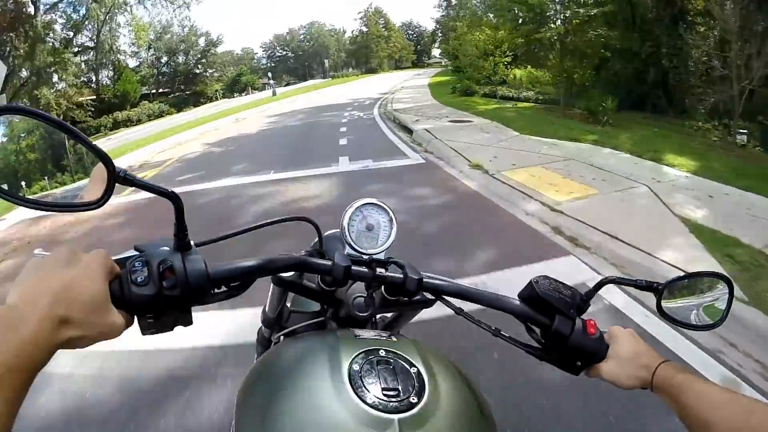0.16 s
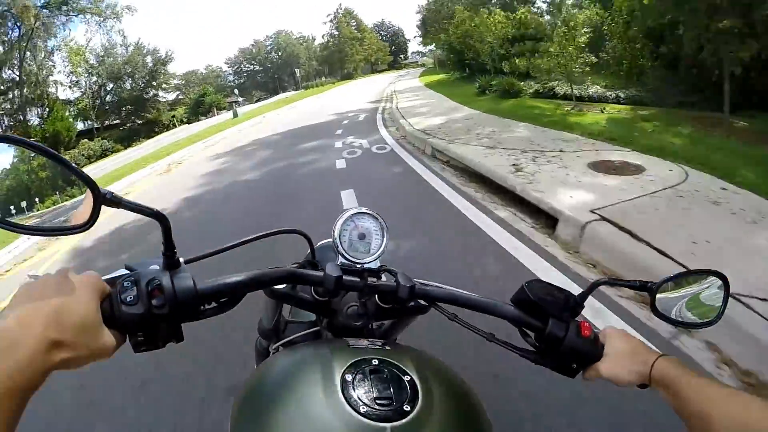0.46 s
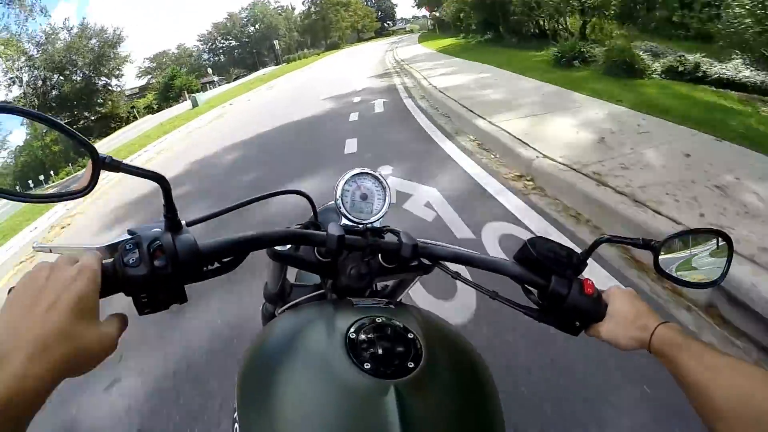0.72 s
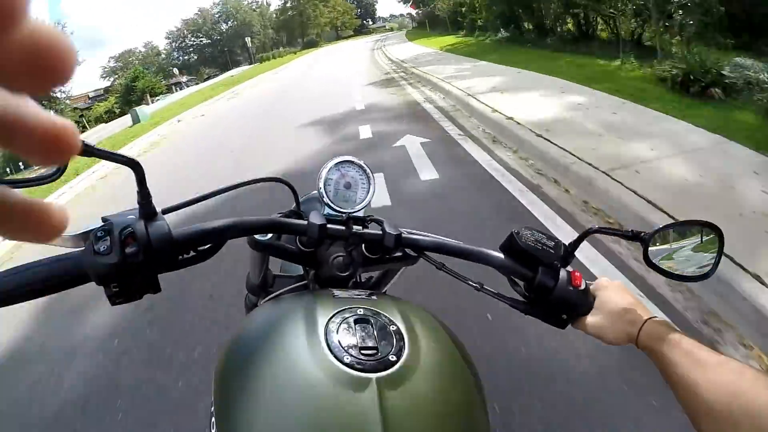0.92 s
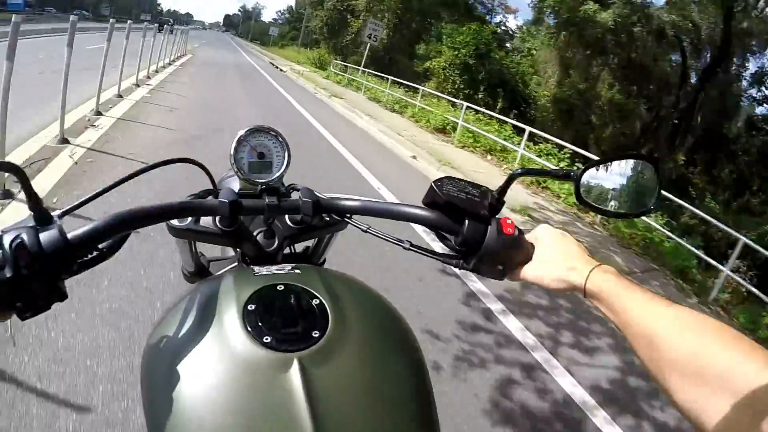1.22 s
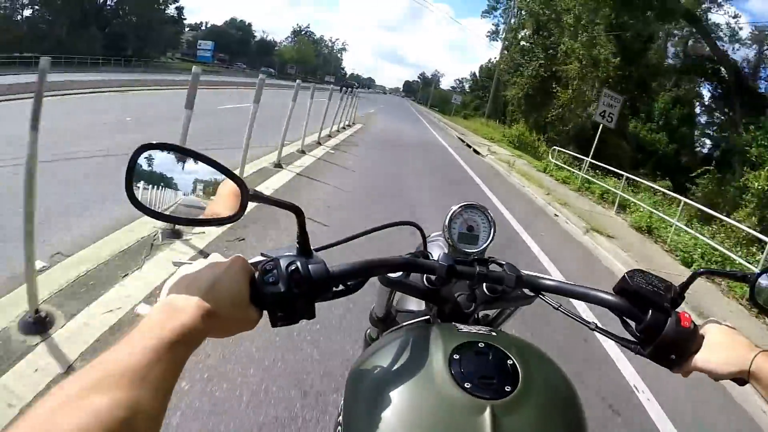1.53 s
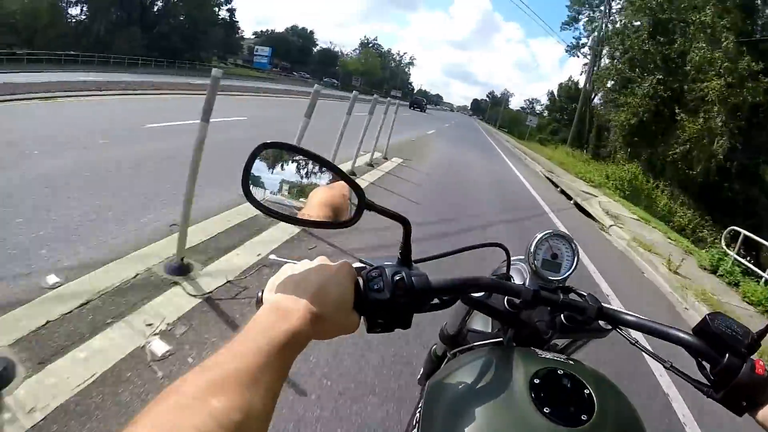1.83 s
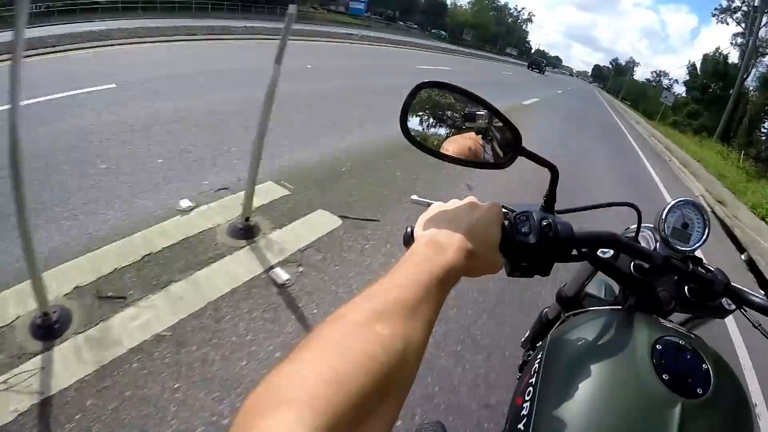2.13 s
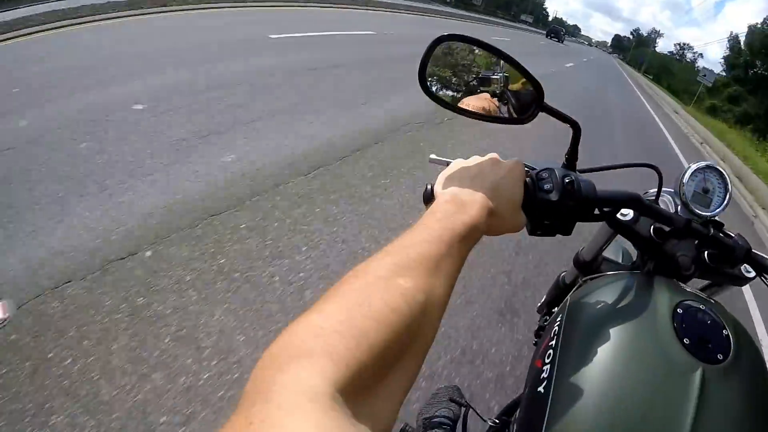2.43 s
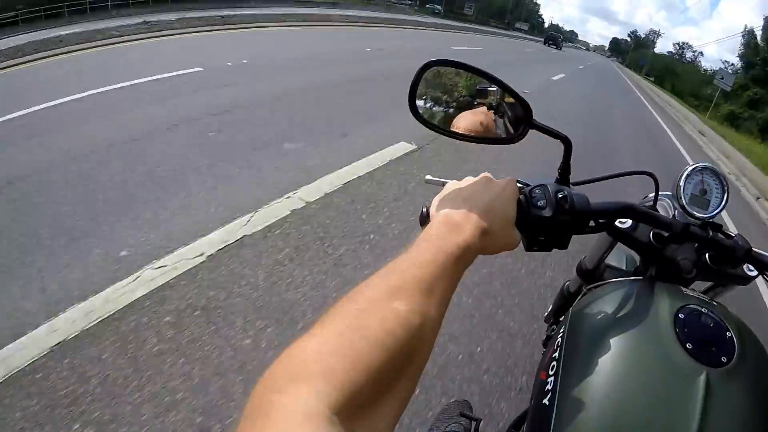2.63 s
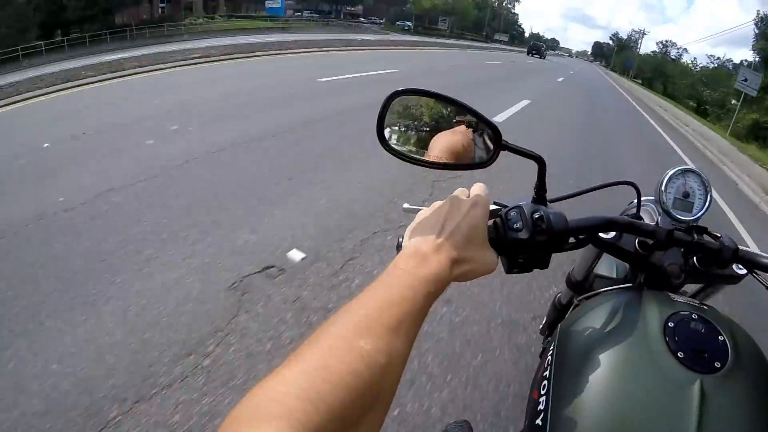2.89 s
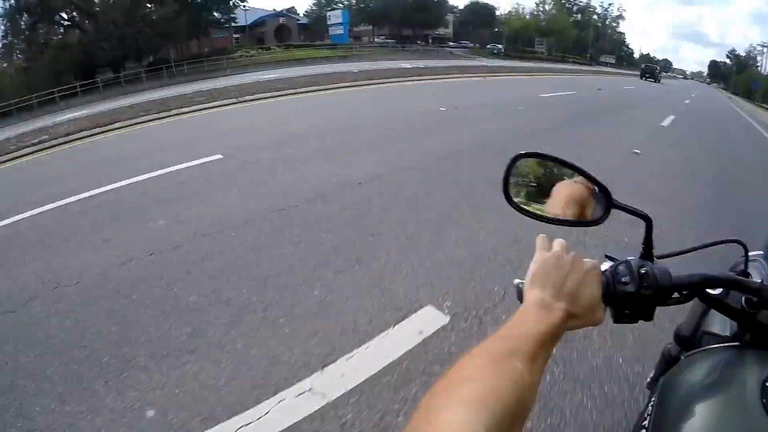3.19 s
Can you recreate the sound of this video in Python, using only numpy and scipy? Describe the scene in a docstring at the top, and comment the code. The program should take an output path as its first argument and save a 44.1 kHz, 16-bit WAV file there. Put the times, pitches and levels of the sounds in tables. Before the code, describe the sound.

A V-twin motorcycle engine heard at the rider's helmet thumps deep and uneven on light throttle, nearly steady in pitch, with soft valve clatter and low wind rumble. At 1.15 seconds it jumps abruptly higher and raspier, climbing steadily. From about 2 seconds a hoarse intake bark joins. Around 3.15 the throttle shuts, pitch and rasp fall, and faint metallic gear clacks follow at 3.2, ending at 3.35.

```python
"""A V-twin cruiser engine, heard from the rider's helmet, rolls on a light throttle. After an abrupt jump in time
it pulls hard, opens up fully and shuts off for an upshift. Two unevenly spaced firings per cycle make the
exhaust pipe thump; noise bursts shaped by filters add a rasp and, when pulling hard, an intake bark.
Filtered hiss and ticks make the valve clatter, slowly wavering noise makes the wind, and short
bursts of noise make the gearbox clack."""
import sys
import numpy as np
from scipy import signal
from scipy.fft import rfft, irfft
from scipy.io import wavfile
from scipy.ndimage import uniform_filter1d

SR = 44100
rng = np.random.default_rng(int(sys.argv[2]) if len(sys.argv) > 2 else 0)


def bounce(signal):
    """Save signal as a 16-bit WAV file at the path given by the first command-line argument."""
    frames = np.transpose(np.atleast_2d(signal))
    limited = np.clip(frames, -1, 1)
    pcm = np.round(limited * 32767).astype(np.int16)
    wavfile.write(sys.argv[1], SR, pcm)


N = 147735  # length in samples, 3.35 s


def amp(db):
    """Turns decibels into a gain."""
    return 10 ** (np.asarray(db) / 20)


def evened(x):
    """Scales a sound to an average power of one."""
    return x / np.sqrt(np.mean(x ** 2) + 1e-20)


def curve(points):
    """Joins (time, value) points with straight lines, giving a value at every sample."""
    return np.interp(np.arange(N) / SR, *np.transpose(points))


def add(mix, s, sound):
    """Mixes a sound in at time s, dropping whatever falls outside the mix."""
    at = round(s * SR)
    part = mix[max(at, 0):max(at + len(sound), 0)]
    part += sound[max(-at, 0):][:len(part)]


def colour(x, points, size=8192):
    """Filters a sound to a given spectrum; the filter only rings after its input, never before."""
    hz, db = np.transpose(points)
    bins_hz = abs(np.fft.fftfreq(size, 1 / SR)) + 1
    log_gain = np.log(amp(np.interp(np.log(bins_hz), np.log(hz), db)))
    # the Hilbert transform supplies the phase that makes the ring start at once (minimum phase)
    ring = np.fft.ifft(np.exp(np.conj(signal.hilbert(log_gain)))).real[:size // 2]
    return signal.fftconvolve(x, ring)[:len(x)]


# Engine speed on the light throttle. Each row: time in seconds, engine cycles per second.
ROLLING = [(0, 21.18), (.15, 21.8), (.35, 22.24), (.6, 22.28), (.85, 22.46), (1.15, 22.39)]
# Engine speed while pulling, then shutting off. Each row: time in seconds, engine cycles per second.
PULLING = [(1.15, 27.2), (1.35, 28.46), (1.6, 29.79), (1.9, 31.55), (2.1, 33.61), (2.35, 35.72),
           (2.6, 37.78), (2.85, 39.72), (3.13, 41.5), (3.18, 39.2), (3.26, 36.8), (3.35, 33.8)]
# How far the throttle is open. Each row: time in seconds, opening from 0 to 1.
THROTTLE = [(0, 0.25), (.4, 0.26), (1.14, 0.36), (1.16, 0.57), (1.6, 0.72), (1.9, 0.71), (2.05, 0.79),
            (2.45, 0.85), (3.13, 1), (3.16, 0.08), (3.35, 0.08)]
JUMP_S = 1.15  # when the ride jumps ahead in time, seconds
ROLL_FIRING_S, PULL_FIRING_S = .1138, 1.2743  # a front firing in each stretch, before any jitter, seconds
REAR_LAG = .417  # the rear cylinder fires this part of a cycle after the front
JITTER_S, UNEVEN_DB = .00014, 1.0  # typical spread of firing time and strength with the throttle shut
UNEVEN_FADE = 2.6  # how strongly an open throttle steadies the firing


def firings():
    """Front and rear cylinder firings, rows of (time, strength), steadier as the throttle opens."""
    t = np.arange(N) / SR
    stretches = ((ROLLING, ROLL_FIRING_S, t < JUMP_S), (PULLING, PULL_FIRING_S, t > JUMP_S))
    cylinders = []
    for lag in (0, REAR_LAG):
        times = []
        for speed, anchor, part in stretches:
            turns = np.cumsum(curve(speed)) / SR
            count = np.floor(turns - np.interp(anchor, t, turns) - lag)
            fires = np.diff(count, prepend=count[0]) > 0  # each new whole cycle
            times += list(t[fires & part])
        unsteady = np.exp(-UNEVEN_FADE * np.interp(times, *np.transpose(THROTTLE)) ** 2)
        slip, size = rng.standard_normal((len(times), 2)).T * unsteady
        cylinders.append(np.transpose([times + JITTER_S * slip * unsteady, amp(UNEVEN_DB * size)]))
    return cylinders


def puffs(cylinders, delay, rear_db, rear_delay):
    """Makes one single-sample pulse per firing, with its own level and delay for the rear cylinder."""
    out = np.zeros(N)
    for rear, rows in enumerate(cylinders):
        for s, size in rows:
            add(out, s + delay + rear * rear_delay, np.array([size * amp(rear * rear_db)]))
    return out


# Exhaust tone at four throttle openings, from shut to full.
# Each row of these four: frequency in Hz, relative level in dB.
SHUT = [(20, -30), (40, -24), (75, -1), (112, 3), (150, 1), (190, -1.5), (260, -24), (400, -23),
        (560, -25.5), (1500, -57), (5000, -58)]
LIGHT = [(20, -30), (66, -22), (88, -7), (111, 1), (140, -11), (180, -4), (240, -3.5), (275, -14),
         (370, -16.5), (500, -29), (1100, -51.5), (5000, -69.5)]
HALF = [(20, -12), (56, -9), (85, -0.5), (112, -5.5), (142, 3.5), (170, 6.5), (210, 3), (260, -1.5),
        (350, -7.5), (520, -15.5), (1200, -34), (5000, -57)]
FULL = [(20, -24), (45, 1), (76, 10.5), (112, 6), (150, -5), (190, -1), (235, 7.5), (280, 0.5), (325, -17),
        (400, 1.5), (470, -24), (560, -16.5), (700, -28.5), (900, -32), (5000, -54)]
# How the pipe sounds at each opening. Each row: throttle from 0 to 1, tone table, puff delay in seconds,
# rear cylinder level in dB against the front, extra rear delay in seconds.
PIPE = [(0, SHUT, .0042, .5, -.0006), (.3, LIGHT, .0002, .3, 0), (.6, HALF, .0002, -1, 0),
        (1, FULL, .0005, .8, .0005)]
# Exhaust loudness. Each row: time in seconds, level in dB.
EXHAUST_DB = [(0, -9.5), (.2, -9), (.5, -12.5), (.8, -12.5), (1.11, -11.5), (1.15, -16), (1.2, -13.5),
              (1.6, -9.5), (2.05, -11.5), (2.5, -12), (3.1, -13), (3.2, -9.5), (3.35, -12.5)]
PIPE_LAG_HZ = 450  # tones well below this trail the rest


def exhaust(cylinders):
    """Puffs ring the pipe, whose tone follows the throttle; the bass trails the edge of each puff."""
    throttle = curve(THROTTLE)
    openings = [row[0] for row in PIPE]
    out = 0
    # each share is 1 at its own opening and 0 at the others, so the four tones crossfade
    for share, (_, spectrum, *timing) in zip(np.eye(len(PIPE)), PIPE):
        train = puffs(cylinders, *timing)
        tone = evened(colour(train - train.mean(), spectrum))
        out = out + np.interp(throttle, openings, share) * tone
    pole = np.exp(-2 * np.pi * PIPE_LAG_HZ / SR)
    trailing = signal.lfilter([-pole, 1], [1, -pole], out)  # all-pass: shifts timing, not level
    return trailing * amp(curve(EXHAUST_DB))


CLIMB = .05  # total rise of the duct resonances, as a share of their frequency
CLIMB_SPEEDS = (33, 41)  # engine speeds where the rise starts and ends, cycles per second


def climbing(x, spectrum):
    """Duct resonances rise with engine speed, by fading from a lowered filter to a raised one."""
    share = np.interp(curve(PULLING), CLIMB_SPEEDS, (0, 1))
    low = colour(x, [(hz * (1 - CLIMB / 2), db) for hz, db in spectrum])
    high = colour(x, [(hz * (1 + CLIMB / 2), db) for hz, db in spectrum])
    return (1 - share) * low + share * high


TURBULENT_HZ = 1500  # the fresh turbulence lies above this


def gas_bursts(cylinders, spectrum, lead_s, rise_s, rear_db, rear_delay_s, rough, spread_db, size=1024):
    """Gas tears through a valve: each cylinder repeats its own burst, with fresh turbulence in the treble."""
    u = np.arange(size) / SR / rise_s
    shape = u ** 2 * np.exp(-u)  # strongest at twice rise_s
    steady, turbulent = np.zeros(N), np.zeros(N)
    for rear, rows in enumerate(cylinders):
        own = shape * rng.standard_normal(size)
        for _ in range(8):  # evens out the burst's spectrum while keeping it short
            flat = irfft(np.exp(1j * np.angle(rfft(own))))
            own = flat * np.sqrt(shape)
        for s, strength in rows:
            at = s - lead_s + rear * rear_delay_s
            gain = strength * amp(rear * rear_db)
            add(steady, at, gain * evened(own))
            fresh_gain = gain * amp(spread_db * rng.standard_normal())
            add(turbulent, at, fresh_gain * evened(shape * rng.standard_normal(size)))
    treble = signal.butter(2, TURBULENT_HZ, "high", fs=SR, output="sos")
    turbulent = signal.sosfilt(treble, turbulent)
    return evened(climbing(steady + rough * turbulent, spectrum))


# Tone of the rasp. Each row: frequency in Hz, relative level in dB.
RASP = [(100, -0.5), (350, 14), (600, 7.5), (850, 4), (1150, 4), (1400, -3), (1700, 1), (2050, -1),
        (2250, -8), (2600, -6.5), (3300, -11), (4500, -19.5), (10000, -59.5)]
# Rasp loudness. Each row: time in seconds, level in dB.
RASP_DB = [(0, -28), (.2, -36), (.5, -59), (1.14, -55), (1.165, -25), (1.5, -26), (1.9, -24.5), (2.1, -20),
           (3.13, -27.5), (3.17, -38), (3.35, -44)]
# Shape of one rasp burst. The values: start ahead of the firing in seconds, rise in seconds, rear cylinder
# level in dB against the front, extra rear delay in seconds, turbulence (before its filter) as a share.
RASP_BURST = (.0018, .0015, 2, .0003, .75)


def rasp(cylinders):
    """The sharp edge of each exhaust puff, a short burst of noise."""
    return gas_bursts(cylinders, RASP, *RASP_BURST, spread_db=.9) * amp(curve(RASP_DB))


# Tone of the clatter. Each row: frequency in Hz, relative level in dB.
CLATTER = [(200, 7), (550, 12.5), (1000, 10), (1500, -1), (2400, -1.5), (3700, -4.5), (4800, -11.5),
           (5250, -6.5), (5800, -11), (8500, -11.5), (8950, -8), (9900, -11), (10900, -23), (15000, -26.5)]
# Clatter loudness. Each row: time in seconds, level in dB.
CLATTER_DB = [(0, -29.5), (.25, -33), (.5, -36.5), (1.13, -34), (1.18, -30.5), (1.9, -29.5), (2.05, -26),
              (2.6, -26.5), (3.1, -27.5), (3.17, -31.5), (3.35, -31)]
CLATTER_SWELL, SWELL_S = 0.5, 0.015  # extra hiss per firing, and twice its time to peak in seconds
TICKS_PER_S, TICK_SHARE = 260, 0.63  # average tick rate, and tick level against the hiss


def clatter(cylinders):
    """Valves and chain: a mechanical hiss that swells with each firing, with sharp ticks in it."""
    t = np.arange(SR // 20) / SR
    bump = t / SWELL_S * np.exp(1 - 2 * t / SWELL_S) * 2
    swell = signal.fftconvolve(puffs(cylinders, 0, 0, 0), bump)[:N]
    hiss = evened((1 + CLATTER_SWELL * swell) * rng.standard_normal(N))
    hits = (rng.random(N) < TICKS_PER_S / SR) * rng.random(N) ** 2  # mostly weak, a few strong
    fading = signal.fftconvolve(hits, np.exp(-t / 0.002))[:N]  # each tick dies away over about 2 ms
    ticks = evened(fading * rng.standard_normal(N))
    return evened(colour(hiss + TICK_SHARE * ticks, CLATTER)) * amp(curve(CLATTER_DB))


# Tone of wind and road. Each row: frequency in Hz, relative level in dB.
WIND = [(8, -45), (18, -14), (35, 0), (70, -4), (130, -9), (220, -12), (350, -19), (600, -27), (1500, -40),
        (6000, -60)]
# Wind and road loudness. Each row: time in seconds, level in dB.
WIND_DB = [(0, -26), (.7, -23), (1.1, -22.5), (1.3, -26), (1.9, -26), (2.6, -22), (3.35, -23)]
GUST_DB = 2  # typical swing of the gusts, dB


def wind():
    """Lumpy rumble of air and road: noise whose level wanders slowly at random."""
    smooth = uniform_filter1d(rng.standard_normal(N), size=2500)
    gusts = evened(uniform_filter1d(smooth, size=1500))
    rumble = colour(rng.standard_normal(N), WIND)
    return evened(rumble * amp(GUST_DB * gusts)) * amp(curve(WIND_DB))


# Tone of the intake bark. Each row: frequency in Hz, relative level in dB.
BARK = [(150, -32.5), (400, -4.5), (490, 8.5), (590, 6), (670, -7), (760, 6.5), (880, -4.5), (990, 1.5),
        (1140, 2.5), (1350, -22), (1580, -9.5), (1730, -5), (1880, -3), (2200, -61), (2480, -7),
        (2750, -19.5), (3000, -11), (3250, -17), (3550, -16), (4000, -25), (6000, -32), (12000, -38)]
# Bark loudness. Each row: time in seconds, level in dB.
BARK_DB = [(1.1, -70), (1.88, -40), (1.98, -22), (2.3, -19), (2.7, -18.5), (3.05, -17.5), (3.125, -19),
           (3.16, -50), (3.35, -70)]
# Shape of one bark burst, with the same values in the same order and units as for the rasp.
BARK_BURST = (.002, .0022, -8, .001, .33)


def bark(cylinders):
    """The intake barks on an open throttle: gas bursts through a strongly resonant duct."""
    return gas_bursts(cylinders, BARK, *BARK_BURST, spread_db=.6) * amp(curve(BARK_DB))


# The clacks of the gear change. Each row: start in seconds, level in dB.
CLACKS = [(3.2127, -43), (3.214, -38), (3.23, -45)]
# Ring of the gearbox. Each row: frequency in Hz, relative level in dB.
GEARBOX = [(300, -17), (1000, -2), (2000, -7), (3300, 10), (4700, -2), (7300, 8), (8400, -6), (9000, 20),
           (10000, -18), (11500, -19), (15000, -23)]
CLACK_S = 0.0028  # fading time of the noise that strikes the gearbox, seconds


def gear_change():
    """Short steel clacks as the next gear drops in: quickly fading noise rings the gearbox."""
    t = np.arange(SR // 40) / SR
    out = np.zeros(N)
    for s, db in CLACKS:
        strike = rng.standard_normal(len(t)) * np.exp(-t / CLACK_S)
        add(out, s, amp(db) * evened(colour(strike, GEARBOX)))
    return out


def scene():
    """Adds up engine, wind and gearbox as heard at the helmet."""
    cylinders = firings()
    engine = exhaust(cylinders) + rasp(cylinders) + bark(cylinders) + clatter(cylinders)
    return (engine + wind() + gear_change())[None]


EDGE_HZ = 15350  # top of the treble


def record(dry):
    """Rounds peaks off just under full scale, then cuts the highest treble."""
    held = dry / (1 + (dry / .95) ** 8) ** (1 / 8)
    low_pass = signal.firwin(511, EDGE_HZ, window=("kaiser", 9), fs=SR)
    return signal.oaconvolve(held, low_pass[None], "same")


dry = scene()
out = record(dry)
bounce(out)
```